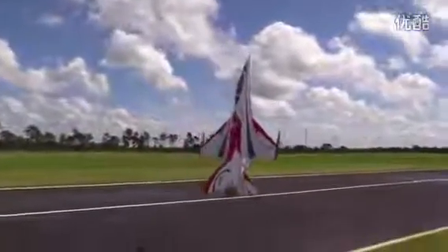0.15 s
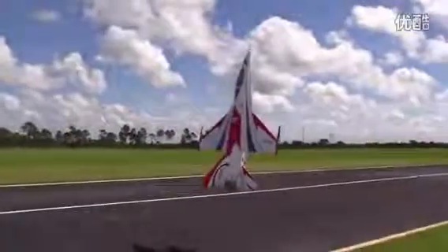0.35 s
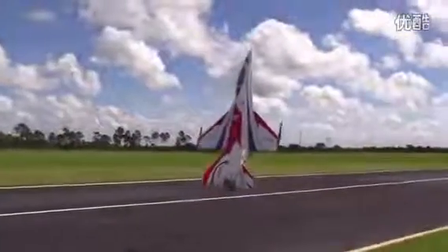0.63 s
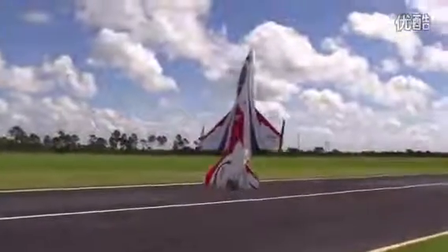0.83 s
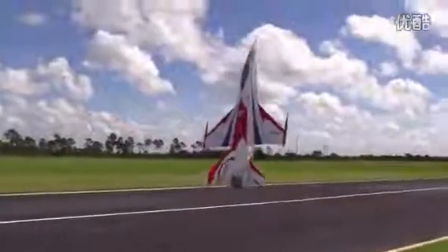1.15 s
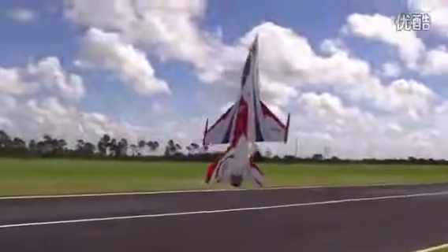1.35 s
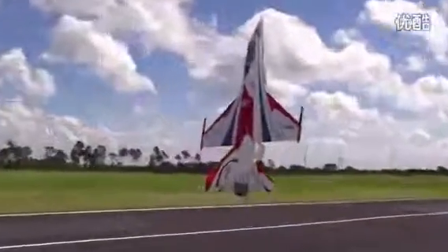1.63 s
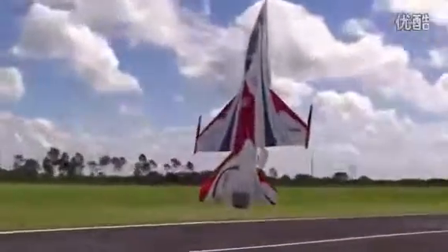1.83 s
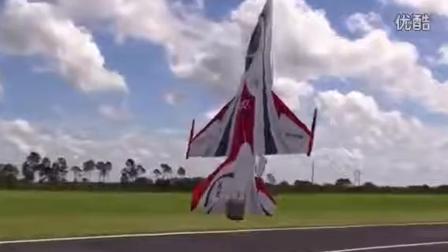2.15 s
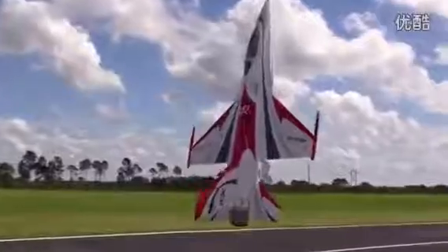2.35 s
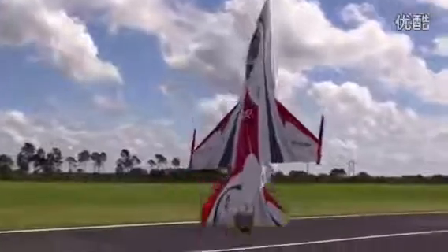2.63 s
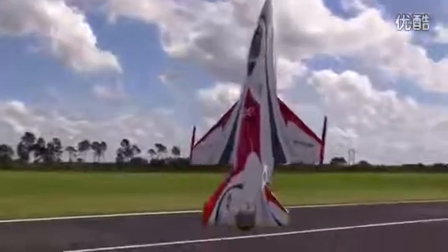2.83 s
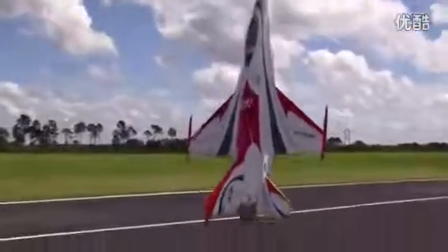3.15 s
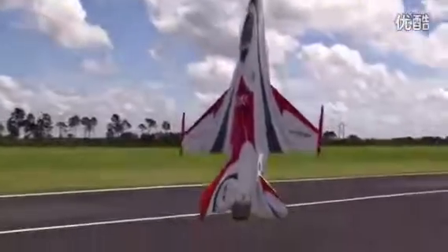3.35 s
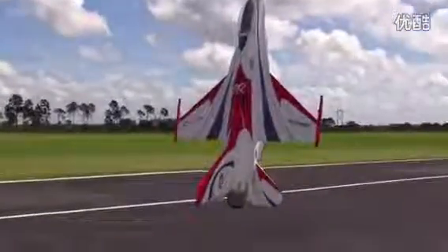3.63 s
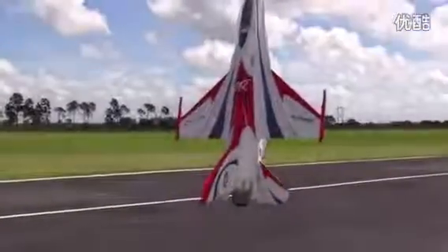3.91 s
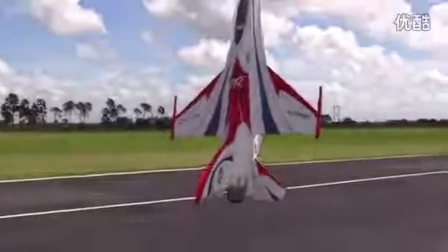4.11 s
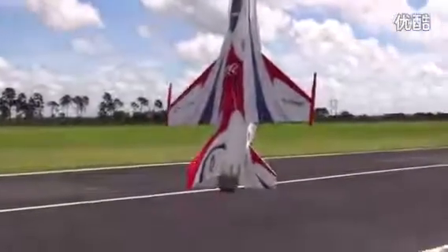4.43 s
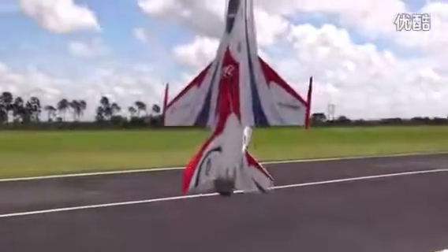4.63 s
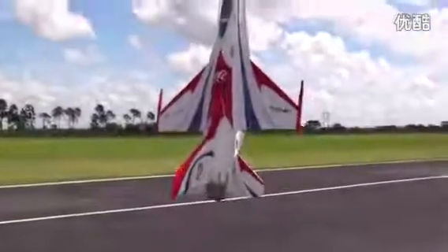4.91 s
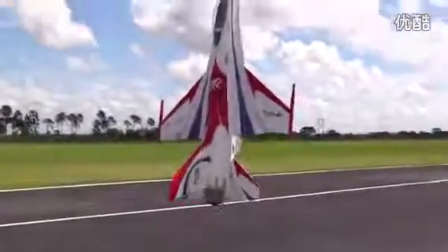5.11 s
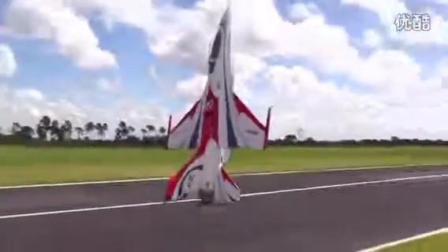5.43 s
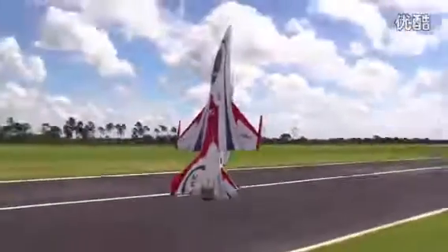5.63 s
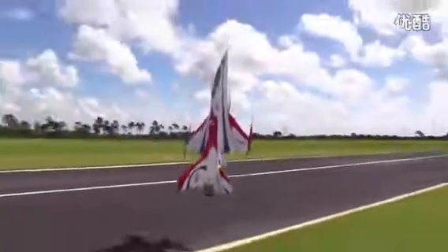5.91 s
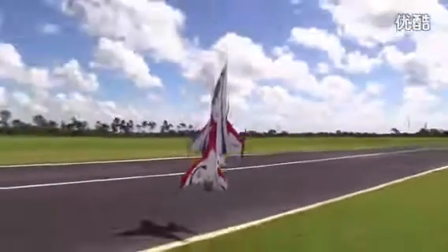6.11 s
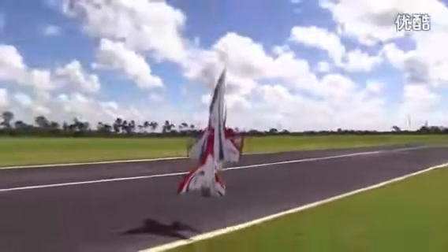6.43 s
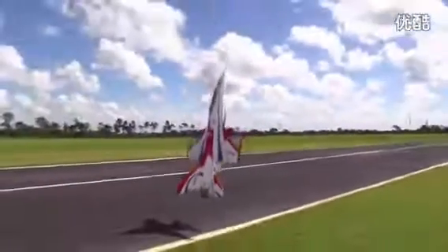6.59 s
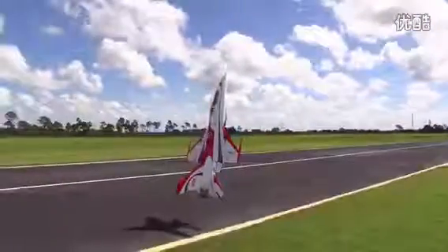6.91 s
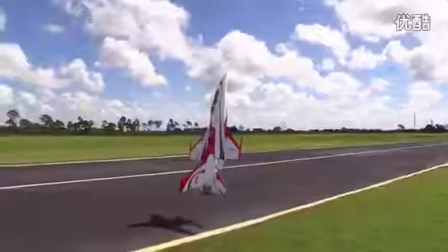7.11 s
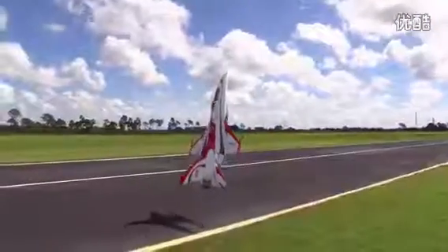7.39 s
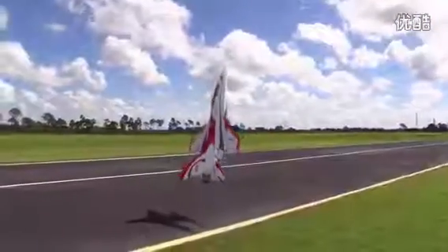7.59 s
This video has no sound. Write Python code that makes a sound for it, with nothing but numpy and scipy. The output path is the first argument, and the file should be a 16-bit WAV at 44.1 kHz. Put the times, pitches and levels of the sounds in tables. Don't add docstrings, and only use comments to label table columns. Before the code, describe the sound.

Harsh, bass-thin jet exhaust rush with a sweeping, flanger-like whine, fluttering hiss swells, light wind on the microphone and clipped bursts near the end.

```python
import sys
import numpy as np
from scipy import signal
from scipy.fft import rfft, irfft, dct, next_fast_len
from scipy.io import wavfile
from scipy.ndimage import uniform_filter1d, map_coordinates

SR = 44100
rng = np.random.default_rng(int(sys.argv[2]) if len(sys.argv) > 2 else 0)


def attenuation_scalar(level_db):
    decades = np.asarray(level_db, float) / 20
    return 10 ** decades


def unload_audio(sound):
    columns = np.transpose(np.atleast_2d(sound))
    steps = np.round(np.clip(columns, -1, 1) * 32767)
    wavfile.write(sys.argv[1], SR, steps.astype(np.int16))


N = 341775


def rms_one(x):
    return x / np.sqrt(np.mean(x ** 2) + 1e-20)


def in_time(rows):
    s, *columns = np.transpose(rows)
    return [np.interp(np.arange(N) / SR, s, c) for c in columns]


def at_hz(points, hz):
    point_hz, point_db = np.transpose(points)
    return np.interp(np.log(hz + 1), np.log(point_hz), point_db)


def swells(rows, hold=1):
    out = np.zeros(N)
    for s, height, half_s in rows:
        first = max(round((s - half_s) * SR), 0)
        last = min(round((s + half_s) * SR), N)
        i = np.arange(first, last)
        bump = np.cos(np.pi / 2 * (i / SR - s) / half_s) ** 2
        out[i] += height * np.minimum(hold * bump, 1)
    return out


def drift(rate_hz):
    r = np.exp(-80 * np.pi * rate_hz / SR)
    chance = rng.standard_normal(N // 40 + 2002)
    slow = signal.lfilter([1], [1, -2 * r, r * r], chance)[2000:]
    return np.interp(np.arange(N) / 40, np.arange(len(slow)), rms_one(slow))


def coloured(x, gain):
    size = next_fast_len(N)
    hz = np.arange(size // 2 + 1) * SR / size
    return irfft(rfft(x, size) * gain(hz), size)[:N]


# time in seconds, extra path in ms, phase lost in rad, reflected share 0-1.
BOUNCE = [(.15, 1.23, 0, .6), (.6, 1.22, 0.53, 0.5), (.95, 1.05, -0.03, 0.7), (1.3, 0.63, 3, 0),
          (1.95, 0.63, 2.5, .5), (2.3, 0.92, 0.0, 0.5), (2.8, 1.223, -.5, .75), (3.4, 1.48, 0.15, 0.3),
          (3.75, 1.45, 1.15, 0.4), (4.25, 1.27, 1, 0.2), (4.55, 1.196, -0.7, 0.8), (5.15, .925, .95, 0.4),
          (5.5, .96, 0.5, 0.5), (5.95, 0.92, 1.8, 0.8), (6.9, 1.066, 0.45, .85), (7.15, 0.87, 1.8, 0.6),
          (7.45, 0.95, 0.5, .5), (7.7, 0.57, 2, 0.2)]
# frequency in Hz, density in dB per Hz.
EXHAUST_COLOUR = [(560, -26), (650, -18), (780, -5), (1000, -2.5), (1400, -3), (2200, -3.5), (3200, -5),
                  (4400, -7.5), (5800, -4.5), (7300, -6.5), (9000, -10.5), (10000, -17), (11000, -24.5),
                  (12500, -21)]
# centre in seconds, added share 0-1, half-length in seconds.
GLINTS = [
    (1.6, 0.13, 0.58),
    (2.45, 0.39, .15),
    (2.92, .35, .2),
    (3.4, .15, 0.27),
    (4.1, 0.26, 0.27),
    (6.1, .35, 1.1),
    (7.35, .3, 0.39),
]
TREBLE_SHARE = .28
DEEP_LAG_RAD, DEEP_SHARE, DEEP_FLICKER_DB = .3, 0.89, 3.5
HISS_APART_DB = 1.14


def turbulence(own_db, shared_db, crackle_db, twist_rad, fade_db):
    white = rng.standard_normal(N) * attenuation_scalar(crackle_db * drift(340))
    size = next_fast_len(N)
    hz = np.arange(size // 2 + 1) * SR / size
    spectrum = rfft(white, size) * attenuation_scalar(at_hz(EXHAUST_COLOUR, hz)) * (hz > 300)
    place = np.clip(3 * np.log2((hz + 1) / 600), 0, 14)
    _, lag_rad, bass_share = in_time(BOUNCE)
    treble_share = TREBLE_SHARE + swells(GLINTS)
    shared = drift(11.0)
    roar, down, hiss = 0, 0, 0
    for k in range(15):
        shape = np.cos(np.pi / 2 * np.clip(place - k, -1, 1)) ** 2
        flicker = attenuation_scalar((own_db if k else DEEP_FLICKER_DB) * drift(12.0))
        band = irfft(spectrum * shape, size)[:N] * flicker
        if k >= 10:
            hiss = hiss + band * attenuation_scalar(shared_db * shared + HISS_APART_DB * drift(6.0))
            continue
        quarter_late = irfft(-1j * spectrum * shape, size)[:N] * flicker
        high = np.clip((k - 4) / 2, 0, 1)
        deep = max(1 - k / 2, 0)
        twist = twist_rad * 2 ** (k / 5) * drift(11.0)
        turn = lag_rad + deep * (DEEP_LAG_RAD - lag_rad) + twist
        share = bass_share + high * (treble_share - bass_share) + deep * (DEEP_SHARE - bass_share)
        share = np.clip(1.08 * share, 0, .95) * (1 - .25 * max(k - 7.5, 0))
        even = 1 / np.sqrt(1 + share ** 2)
        turned = np.cos(turn) * band + np.sin(turn) * quarter_late
        roar = roar + even * band
        down = down + even * share * attenuation_scalar(fade_db * drift(4.0)) * turned
    return roar, down, hiss


def off_ground(direct, down):
    late_ms = in_time(BOUNCE)[0] + .01 * drift(8.0)
    late = late_ms * SR / 1000
    return direct + map_coordinates(down, [np.arange(N) - late], order=3, mode="nearest")


# time in seconds, level in dB.
THRUST = [(0.0, -20.5), (0.6, -20.5), (1.25, -18), (1.29, -21), (2.39, -19.5), (2.5, -15.5), (2.78, -19),
          (4.27, -18), (4.49, -21), (4.9, -17), (5.37, -20.5), (6.09, -17.5), (6.26, -20.5), (7.02, -19),
          (7.1, -15.5), (7.53, -14), (7.73, -14.5), (7.75, -17.5)]
# centre in seconds, swell in dB, half-length in seconds.
HISS_SWELLS = [(.2, 4, 0.52), (.47, 5, 0.038), (.6, 3.5, 0.086), (.76, 1.5, 0.032), (.9, 1, 0.18),
               (1.09, 6, 0.058), (1.22, 7, 0.1), (1.39, 5.5, 0.11), (1.68, 6.5, 0.062), (1.92, 3.5, 0.19),
               (2.44, 3, 0.052), (2.61, 4, 0.048), (2.86, 3, 0.061), (3.04, 3.5, 0.064), (3.13, 6, 0.054),
               (3.36, 3, 0.093), (3.79, 4, 0.1), (3.97, 3.5, 0.17), (4.22, 5.5, 0.17), (4.4, 4.5, 0.056),
               (4.59, 3, 0.04), (4.95, 2, 0.32), (5.17, 6, .08), (5.48, 3, 0.088), (5.6, 8.5, 0.036),
               (5.99, 3.5, 0.097), (6.16, 3, .1), (6.48, 3.5, 0.088), (6.65, 10, .08), (6.94, 5.5, .06),
               (6.817, 4.5, 0.063),
    (7.147, 2, .12),
    (7.506, 6, 0.079),
    (7.653, 6, 0.052),
]
HISS_DB = -23.5
HISS_FOLLOWS, ROAR_FOLLOWS = .6, 0.22


def jet():
    thrust_db, = in_time(THRUST)
    swell_db = swells(HISS_SWELLS)
    roar_db = thrust_db + ROAR_FOLLOWS * (swell_db - swell_db.mean())
    hiss_db = HISS_DB + HISS_FOLLOWS * (thrust_db - thrust_db.mean()) + swell_db
    roar, down, hiss = turbulence(own_db=.7, shared_db=.6, crackle_db=1.1, twist_rad=.24, fade_db=2.2)
    roar = off_ground(roar, down)
    loud = attenuation_scalar(roar_db) * rms_one(roar) + attenuation_scalar(hiss_db) * rms_one(hiss)
    rounded = .9 * np.tanh(loud / .9)
    return coloured(rounded, lambda hz: 1 / (1 + (620 / (hz + 1)) ** 16))


# time in seconds, level in dB.
WIND = [
    (0, -78.5),
    (.55, -72.5),
    (.85, -59),
    (3.0, -59.5),
    (3.5, -57.5),
    (4.7, -50),
    (6.1, -48.5),
    (7.1, -53.5),
    (7.75, -58),
]
# frequency in Hz, level in dB.
WIND_COLOUR = [(24, -49), (40, -20.5), (108, -15), (231, 0.5), (348, -4), (449, -1), (560, 8), (730, -14.5),
               (1230, -120)]
# centre in seconds, depth in dB, half-length in seconds.
LOW_GAPS = [(1.31, -5, 0.17), (3.13, -12, 0.062), (3.71, -18, 0.071), (3.91, -38, 0.04), (4.06, -16, 0.032),
            (4.18, -28, 0.055), (4.44, -38, 0.13), (4.73, -30, 0.049), (4.97, -3, .08), (5.24, -9.5, 0.18),
            (5.5, -21, 0.096), (5.74, -8, 0.074), (5.83, -6, 0.05), (6.06, -14, .04), (6.28, -14, 0.064),
            (6.39, -4, 0.077), (6.56, -27, 0.052), (6.71, -14, 0.033), (7.03, -11, 0.055), (7.32, -7.5, 0.051),
            (7.42, -4, 0.064), (7.62, -21.5, 0.081)]
# level over the strength in dB, share of the gaps 0-1, flutter in dB.
WIND_RANGES = [
    (-12, 0.11, 6),
    (-1, 1.0, 5),
    (-3, 0.65, 4),
]
# centre in seconds, depth in dB, half-length in seconds.
CALM = [
    (2.0, -13, 2.2),
]
UPPER_CALM_DB, UPPER_FROM_S = -60, 2.9


def wind():
    out = 0
    edges_hz = (20, 200, 420, 640)
    strength_db, = in_time(WIND)
    gap_db = swells(LOW_GAPS, hold=1.5)
    early = np.arange(N) / SR < UPPER_FROM_S
    for low, high, (db, share, flutter_db) in zip(edges_hz, edges_hz[1:], WIND_RANGES):
        noise = coloured(rng.standard_normal(N),
                         lambda hz: attenuation_scalar(at_hz(WIND_COLOUR, hz)) * (hz >= low) * (hz < high))
        level_db = strength_db + db + share * gap_db
        if high == edges_hz[-1]:
            level_db = np.where(early, UPPER_CALM_DB + swells(CALM), level_db)
        flutter = flutter_db * np.tanh(drift(10.0))
        out = out + attenuation_scalar(level_db + flutter) * rms_one(noise)
    return out


def scene():
    return np.tile(jet() + wind(), (2, 1))


# frequency in Hz, step in dB.
SMALLEST_STEP = [(60, -57), (130, -53), (250, -51), (480, -46), (600, -36), (690, -22), (850, -26),
                 (7000, -24), (9600, -19), (9700, -11), (10500, -12), (11200, -10), (12300, -7), (12600, 5)]
# frequency in Hz, step over that level in dB.
RELATIVE_STEP = [(560, -40), (800, -4), (1500, 0), (3000, 2), (5000, 1), (7500, 3), (9000, 7)]


def thin_spectrum(x, finer_db, wobble_db, spread_hz, size):
    count = N // size + 2
    window = np.sin(np.pi * (np.arange(2 * size) + .5) / (2 * size))
    blocks = np.pad(x, (size, (count + 1) * size - N - size)).reshape(-1, size)
    a, b, c, d = np.split(np.hstack([blocks[:-1], blocks[1:]]) * window, 4, axis=1)
    lines = dct(np.hstack([-c[:, ::-1] - d, a - b[:, ::-1]]), type=4, norm="ortho")
    hz = (np.arange(size) + .5) * SR / (2 * size)
    spread = round(spread_hz / hz[0] / 2)
    around = np.sqrt(uniform_filter1d(lines ** 2, size=spread, axis=1) + 1e-18)
    mood = uniform_filter1d(rng.standard_normal((count, size // 8)), size=3, axis=0) * np.sqrt(3)
    coarser_db = wobble_db * mood.repeat(8, axis=1) - finer_db
    step = np.maximum(attenuation_scalar(at_hz(SMALLEST_STEP, hz)), around * attenuation_scalar(at_hz(RELATIVE_STEP, hz)))
    step = step * attenuation_scalar(coarser_db)
    lines = np.sign(lines) * np.floor(np.abs(lines) / step + .4054) * step
    p, q = np.split(dct(lines, type=4, norm="ortho"), 2, axis=1)
    frames = np.hstack([q, -q[:, ::-1], -p[:, ::-1], -p]) * window
    return (frames[:-1, size:] + frames[1:, :size]).ravel()[:N]


# centre in seconds, centre in Hz, level in dB.
SLIPS = [
    (.26, 6960, -33),
    (.35, 5900, -33),
    (1.44, 8240, -36),
    (1.63, 6260, -35),
    (1.79, 5970, -28),
    (3.41, 4670, -33),
    (4.53, 5880, -35),
    (5.69, 5100, -34),
]


def slips():
    out, size = np.zeros(N), 2048
    hz = np.arange(size // 2 + 1) * SR / size
    fade = np.sin(np.pi * np.arange(size) / size)
    for s, centre_hz, db in SLIPS:
        puff = irfft(rfft(rng.standard_normal(size)) * (np.abs(hz - centre_hz) < 750), size)
        start = round(s * SR) - size // 2
        out[start:start + size] += attenuation_scalar(db) * rms_one(puff) * fade
    return out


# time in seconds, peak in dB.
TICKS = [(4.231, -54), (7.123, -41), (7.425, -67), (7.45, -68), (7.466, -31), (7.472, -44), (7.478, -29),
         (7.48, -29), (7.488, -45), (7.492, -51), (7.507, -27), (7.511, -33)]


def ticks():
    out = np.zeros(N)
    places = [round(s * SR) for s, db in TICKS]
    out[places] = -attenuation_scalar(np.array(TICKS)[:, 1] + 8)
    return out


def band_limit(x):
    return signal.sosfilt(signal.butter(12, 15800, fs=SR, output="sos"), x)


def record(dry):
    mono = thin_spectrum(dry.mean(axis=0), finer_db=0, wobble_db=3.5, spread_hz=1100, size=1152)
    mono = thin_spectrum(mono, finer_db=8, wobble_db=2, spread_hz=1100, size=1024)
    mono = mono + ticks()
    mix = mono + slips() * np.array([[1], [-1]])
    return band_limit(mix)


dry = scene()
out = record(dry)
unload_audio(out)
```